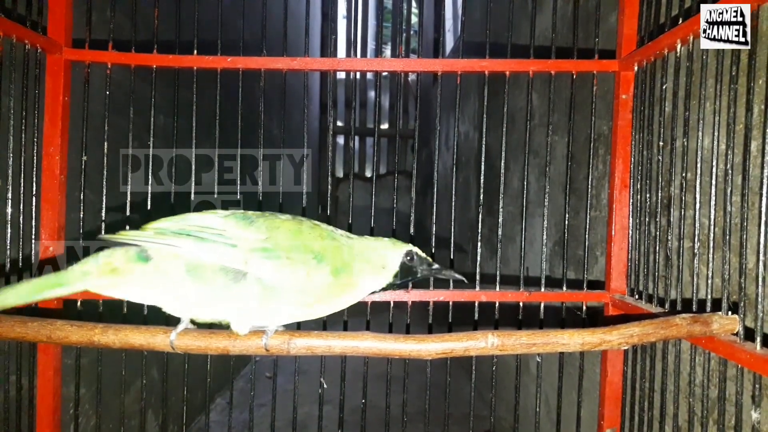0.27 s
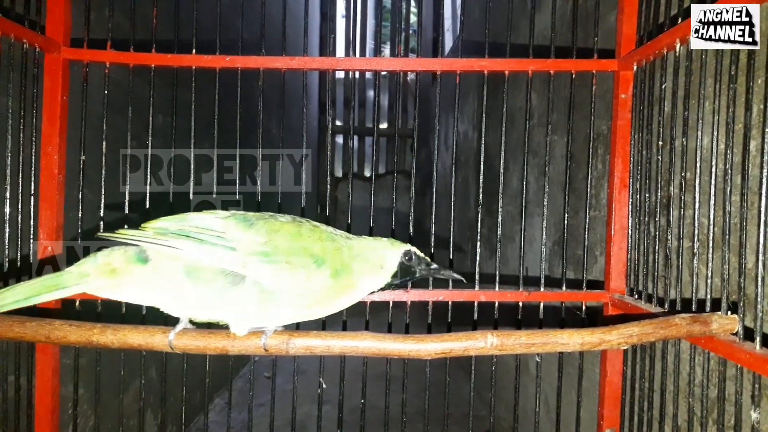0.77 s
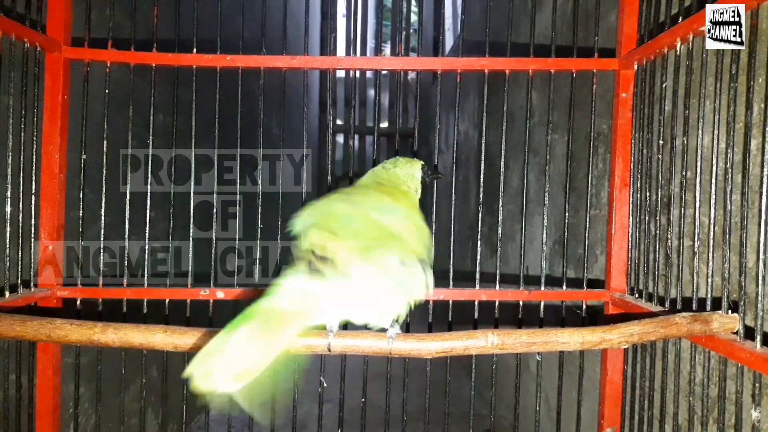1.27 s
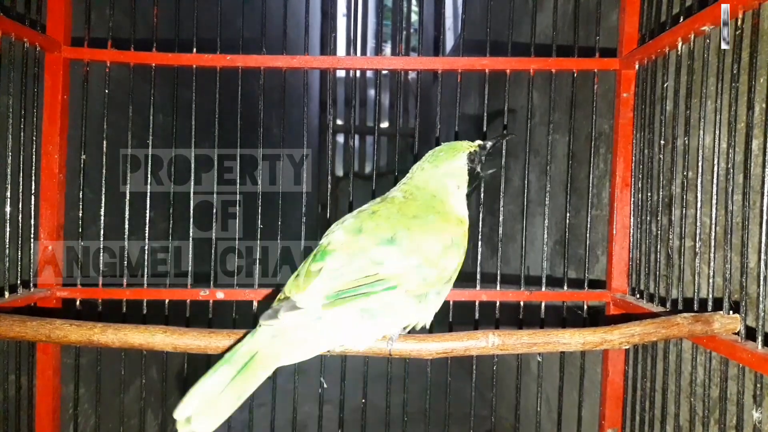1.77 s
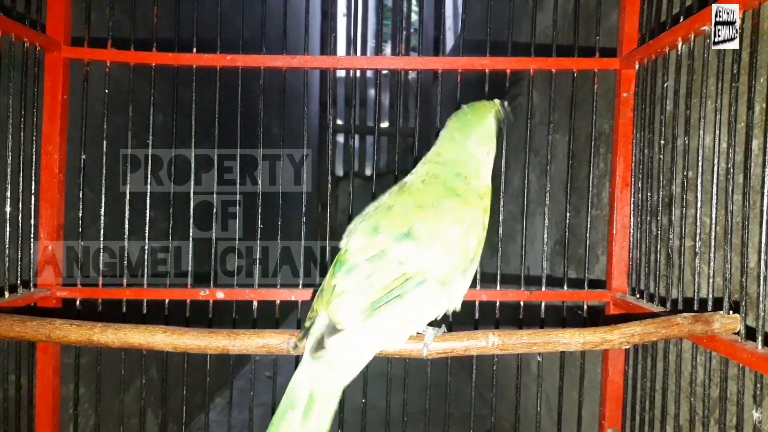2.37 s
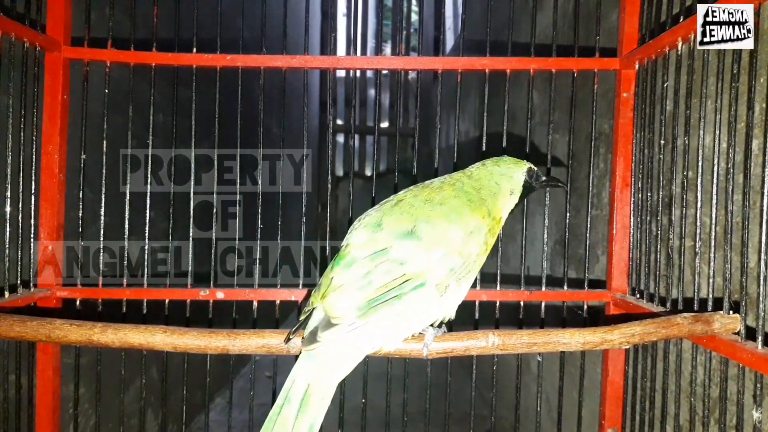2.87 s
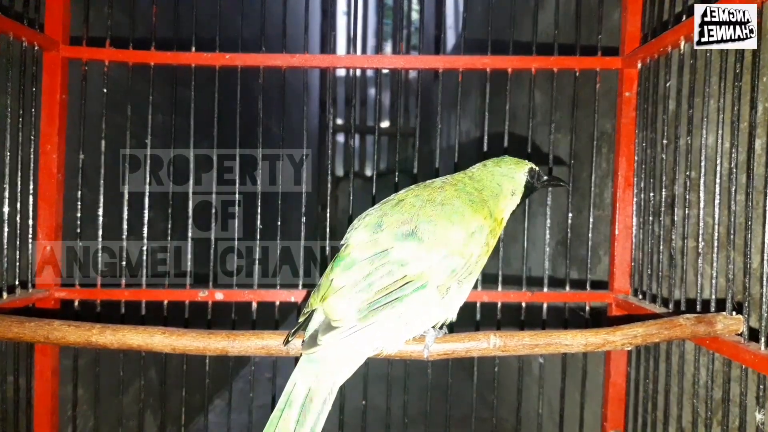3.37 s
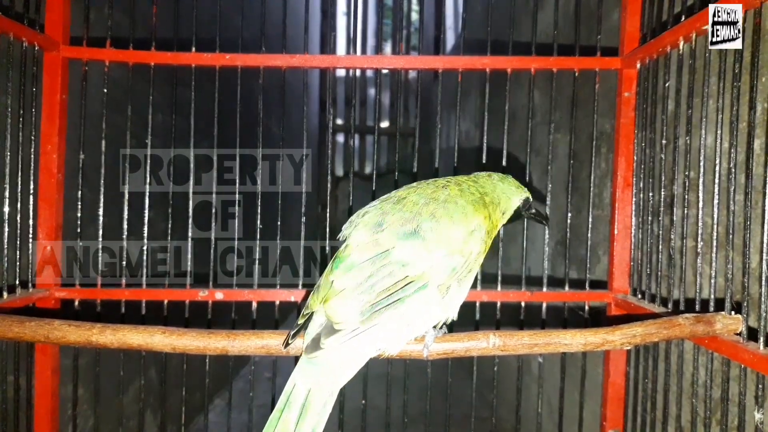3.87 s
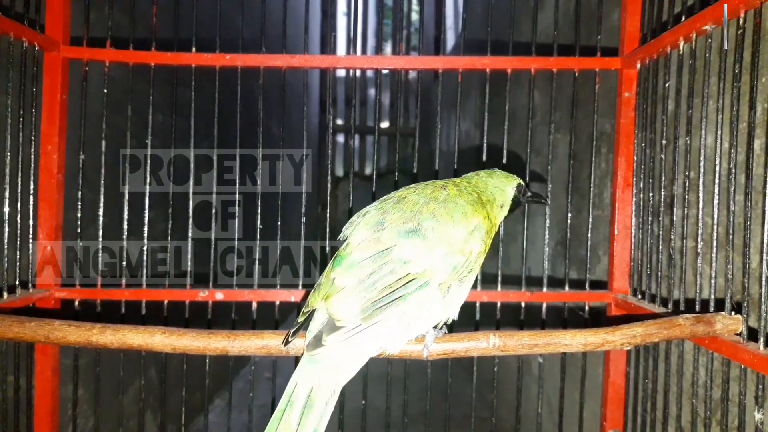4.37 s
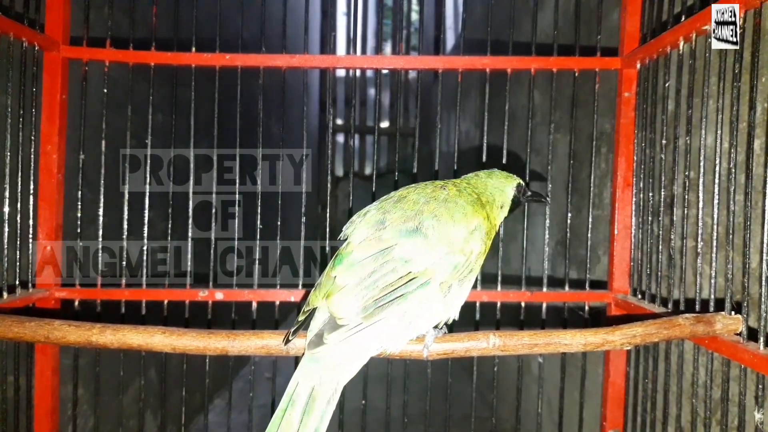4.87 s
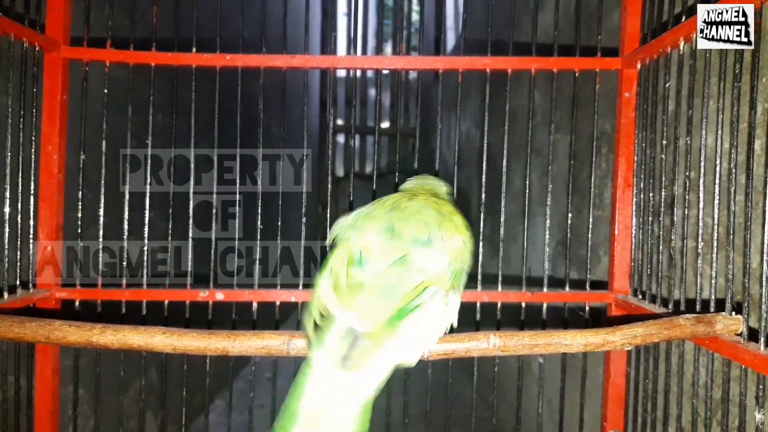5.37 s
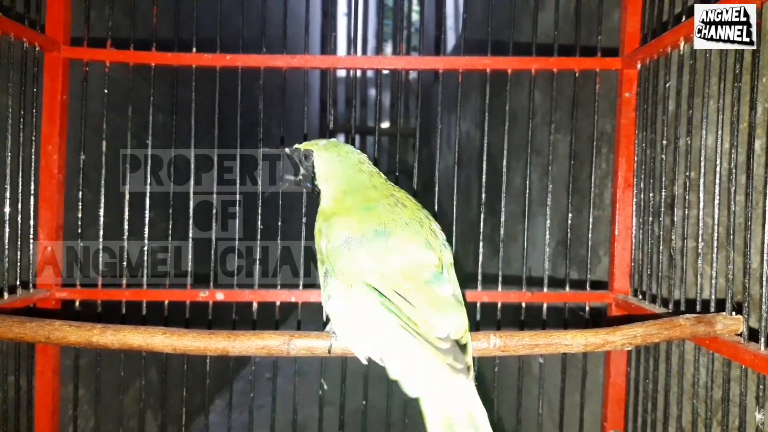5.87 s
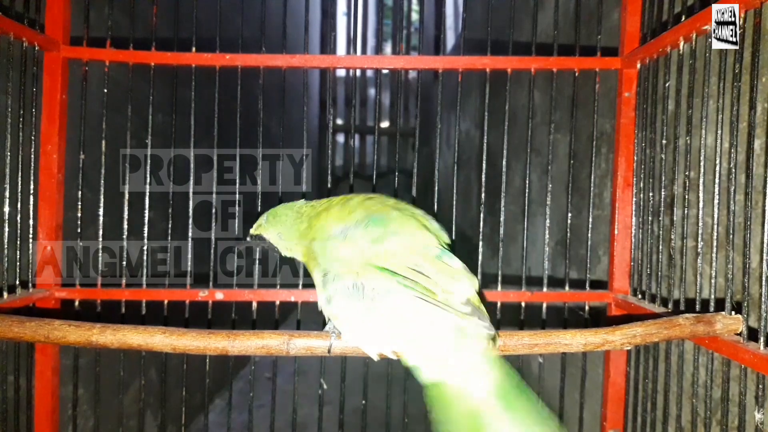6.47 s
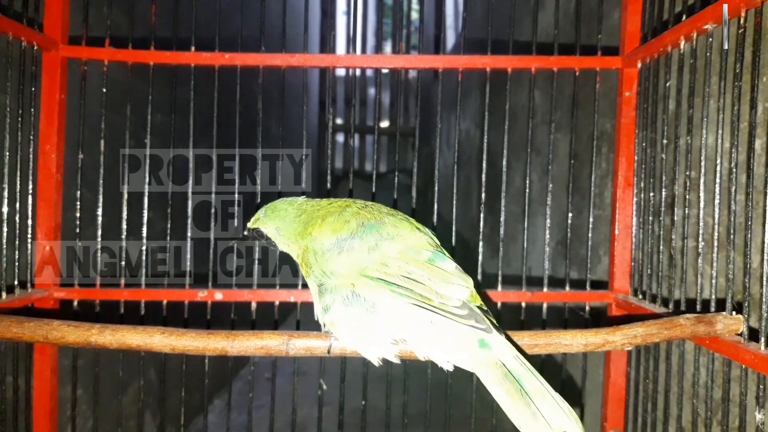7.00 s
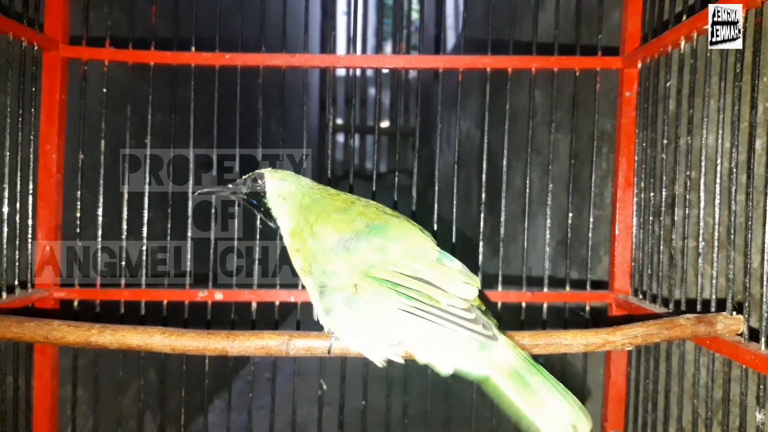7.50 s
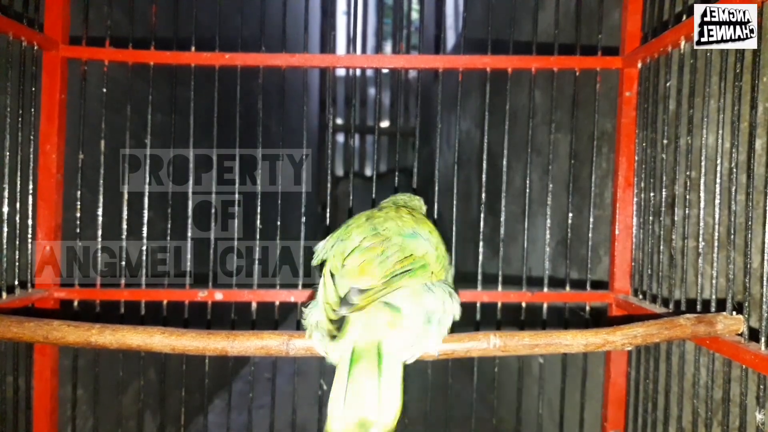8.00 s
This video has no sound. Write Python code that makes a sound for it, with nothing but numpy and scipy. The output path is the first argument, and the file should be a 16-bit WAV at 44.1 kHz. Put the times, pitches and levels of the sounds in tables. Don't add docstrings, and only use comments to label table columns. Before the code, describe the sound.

A songbird in a cage, close to a phone microphone in a small hard-walled room. After a light cage tick and quiet humming air, it whistles five clear gliding notes, two high then three lower. The background sinks, then returns with very faint distant coos and ticks. A second similar five-note phrase follows, briefly echoing off the walls, and faint ticks end it over soft hiss.

```python
import sys
import numpy as np
from scipy import signal
from scipy.fft import rfft, irfft
from scipy.io import wavfile
from scipy.ndimage import uniform_filter1d, minimum_filter1d

SR = 44100
rng = np.random.default_rng(int(sys.argv[2]) if len(sys.argv) > 2 else 0)


def volts(x):
    e = np.asarray(x, float) / 20
    return 10 ** e


def transcribe(signal):
    frames = np.atleast_2d(signal).T
    limited = np.clip(frames, -1, 1)
    pcm = np.round(limited * 32767).astype(np.int16)
    wavfile.write(sys.argv[1], SR, pcm)


N = 363384
T = np.arange(N) / SR


def unit(x):
    return x / np.sqrt(np.mean(x ** 2))


def band(x, lo_hz, hi_hz):
    return signal.sosfilt(signal.butter(2, [lo_hz, hi_hz], "band", fs=SR, output="sos"), x)


def lowpass(hz):
    return signal.butter(2, hz, fs=SR, output="sos")


def add(out, start_s, x):
    i = int(start_s * SR)
    out[i:i + len(x)] += x[:N - i]


def walk(rate):
    hold = int(SR / rate)
    steps = np.repeat(rng.standard_normal(N // hold + 1), hold)
    return 0.88 * uniform_filter1d(uniform_filter1d(steps, hold), hold)[:N]


def whistle(hz, db, overtones_db, rough):
    phase = 2 * np.pi * np.cumsum(hz) / SR
    tone = volts(db) * np.sin(phase)
    for k, under_db in enumerate(overtones_db, 2):
        noise = np.convolve(rng.standard_normal(len(hz)), np.hanning(150), "same")
        flutter = 1 + rough * unit(noise)
        level = volts(under_db + .7 * (np.asarray(db) + 8) - 8)
        tone = tone + level * flutter * np.sin(k * phase) * (k * hz < 17000)
    return np.sqrt(2) * tone


def arch(t, start, top, rest, rise, fall, late=False, quick=False):
    up = np.sin(np.pi / 2 * np.clip(t / rise, 0, 1)) ** (1 + late)
    down = np.sin(np.pi / 2 * np.clip((t - rise) / fall, 0, 1)) ** (2 - quick)
    return start + (top - start) * up - (top - rest) * down


# start_s, length_s, level_db, sag_db over the note, attack_s
NOTE_EVENTS = [
    (1.576, 0.099, -6, -4, .012),
    (1.737, 0.11, -9, -1.5, .014),
    (2.097, 0.098, -7.5, -7, 0.031),
    (2.283, 0.098, -11.5, -3, 0.023),
    (2.460, 0.11, -4.5, -10.5, 0.03),
    (5.879, .142, -4, -10, .014),
    (6.038, 0.13, -8.5, -1.5, .024),
    (6.352, 0.12, -4.5, -3.5, 0.031),
    (6.550, 0.079, -6, -3.5, 0.019),
    (6.750, 0.085, -10, 4.5, 0.014),
]
# from_hz, top_hz, rest_hz, rise_s, fall_s
NOTE_ARCHES = [(3980, 4400, 3772, .038, .025), (3850, 4420, 4275, .054, .032),
               (3300, 3665, 2930, .017, .063), (2900, 3000, 2530, .014, .058),
               (2740, 3285, 2865, .035, .052), (4020, 4420, 3785, .040, .034),
               (3750, 4570, 4570, .052, .030), (3250, 3455, 3060, .035, .047),
               (2890, 2925, 2545, .011, .050), (3020, 3430, 2862, .034, .046)]
NOTE_SNAPS = (1700.5, 1247, 0, -5.5, -0.5, 500, 0.5, 499, 0, -4)
NOTE_OVERTONES = [(-29, -32, -43.5, -55, -72), (-33.5, -27.5, -49, -63.5, -73), (-35.5, -34, -44, -38, -70),
                  (-37.5, -39, -44, -38.5, -50.5), (-39.5, -38.5, -53, -34.5, -68),
                  (-30.5, -30.5, -38, -63.5, -74.5), (-27, -28, -48, -60, -70),
                  (-36.5, -32.5, -46.5, -46, -76), (-35, -39.5, -52.5, -43.5, -35.5),
                  (-35.5, -36.5, -45.5, -45.5, -70)]
LATE_RISERS, QUICK_FALLERS = (5, 9), (3, 8)
SNAP_S, RELEASE_S, SILENT_DB = .0035, .013, -29


def song_notes():
    out, waver = np.zeros(N), walk(70)
    rows = zip(NOTE_EVENTS, NOTE_ARCHES, NOTE_SNAPS, NOTE_OVERTONES)
    for k, ((start_s, length, db, sag, attack), shape, snap, overtones) in enumerate(rows):
        t = T[:int(length * SR)]
        opening = np.clip(1 - t / attack, 0, 1) ** 2
        closing = np.clip(1 - (length - t) / RELEASE_S, 0, 1) ** 2
        level_db = db + sag * t / length + SILENT_DB * (opening + closing)
        hz = arch(t, *shape, late=k in LATE_RISERS, quick=k in QUICK_FALLERS)
        hz = hz - snap * np.exp(-t / SNAP_S)
        hz = hz * (1 + .003 * waver[int(start_s * SR):][:len(t)])
        note = whistle(hz, level_db, overtones, rough=0.32)
        add(out, start_s, note * signal.windows.tukey(len(t), .06))
    return out


# centre_s, depth_db, width_s
LEVEL_DIPS = [(2.345, -8, .014), (2.548, -8, 0.0031), (5.955, -6, 0.01), (1.598, -22.5, 0.0022),
              (1.614, -28.5, 0.0015), (1.77, -27, 0.0012), (1.815, -9, 0.0011), (2.143, -18, 0.0014),
              (2.510, -2.5, 0.0016), (5.913, -20, 0.00092), (5.99, -22, 0.0038), (6.089, -14.5, 0.0013),
              (6.128, -16.5, 0.0063), (6.145, -10, 0.0018), (6.413, -17, 0.0023), (6.579, -10.5, 0.0048),
              (6.79, -27, 0.0053)]


def level_dips():
    return volts(sum(db * np.exp(-((T - s) / width) ** 2) for s, db, width in LEVEL_DIPS))


# start_s, length_s, from_hz, to_hz, level_db, overtone_db
SECOND_VOICE = [(1.569, .012, 1600, 2500, -32, -9), (5.875, 0.0075, 2807, 3920, -17, -12.5),
                (1.622, 0.019, 2546, 3920, -16, -23), (1.786, 0.012, 3050, 3960, -16, -21),
                (5.922, 0.011, 2680, 3574, -17.5, -21), (5.935, 0.014, 3050, 3730, -14.5, -20),
                (6.08, 0.015, 2900, 3670, -16, -24.5), (6.089, 0.0051, 3420, 3580, -16.5, -11),
                (6.113, 0.0094, 3610, 3730, -19.5, -20.5), (6.129, 0.0069, 3780, 3820, -25, -15.5)]


def chirps():
    out = np.zeros(N)
    for start_s, length, lo, hi, db, over in SECOND_VOICE:
        u = np.arange(0, 1, 1 / (length * SR))
        hz = lo + (hi - lo) * np.sqrt(u)
        chirp = whistle(hz, db, [over, over - 8, over - 12], rough=0.37)
        add(out, start_s, chirp * np.sin(np.pi * u))
    return out


def puffs(table, lo_hz, hi_hz):
    out = np.zeros(N)
    for start_s, length, db in table:
        puff = rng.standard_normal(int(length * SR))
        puff = unit(band(band(puff, lo_hz, hi_hz), lo_hz, hi_hz))
        add(out, start_s, volts(db) * puff * signal.windows.tukey(len(puff), .6))
    return out


# start_s, length_s, level_db
VALVE_CLICKS = [(1.566, 0.004, -25.5), (1.568, .010, -32), (1.735, 0.0034, -34), (2.087, 0.014, -44.5),
                (2.281, .015, -46), (2.366, 0.0053, -45), (2.454, 0.01, -42.5), (2.558, 0.0034, -40.5),
                (5.865, 0.014, -31), (6.078, 0.029, -41.5), (6.349, 0.0084, -37.5), (6.559, 0.0055, -34),
                (6.745, .006, -47)]


def valve_clicks():
    return puffs(VALVE_CLICKS, lo_hz=1500, hi_hz=4650)


# start_s, length_s, level_db
VOICE_RASPS = [(1.57, .012, -36), (1.615, 0.019, -35.5), (1.784, .013, -40.5), (5.876, 0.011, -36),
               (5.922, 0.025, -35.5), (6.085, 0.017, -33.5), (6.092, .040, -44.5)]


def rasps():
    return puffs(VOICE_RASPS, lo_hz=5320, hi_hz=15400)


def bird():
    first = song_notes() * level_dips()
    second = chirps()
    voices = first + second + volts(-20.0) * first * second
    return voices + valve_clicks() + rasps()


def click(db, lo_hz, hi_hz, decay_s):
    t = T[:1500]
    noise = unit(band(rng.standard_normal(len(t)), lo_hz, hi_hz))
    return volts(db) * noise * np.exp(-t / decay_s) * (1 - np.exp(-t / 0.0016))


# start_s, level_db, high_hz
LOW_THUDS = [(1.628, -25, 1500), (1.634, -26, 1000), (1.786, -30, 1800), (1.793, -30, 1800)]


def thuds():
    out = np.zeros(N)
    for start_s, db, hi in LOW_THUDS:
        add(out, start_s, click(db, 170, hi, decay_s=.0025))
    return out


# start_s, level_db, low_hz, high_hz
CAGE_TICKS = [(.031, -37.5, 2000, 7000), (.609, -44, 2100, 11000), (1.210, -40, 5100, 15500),
              (4.366, -41, 1100, 9000), (5.649, -39, 1000, 6000), (7.685, -55, 10000, 15700),
              (7.82, -54, 5000, 19000), (8.22, -51, 9000, 11900)]


def cage_ticks():
    out = np.zeros(N)
    for start_s, db, lo, hi in CAGE_TICKS:
        add(out, start_s, click(db, lo, hi, decay_s=0.0034))
    return out


def room(x, t60_s=.22, late_t60_s=0.33, late_db=-15, treble_t60_s=0.18,
         wet_db=-6, treble_wet_db=-2.5, onset_s=0.009, gap_s=0.0066):
    t = T[:int(.7 * SR)]
    echoes = rng.standard_normal(len(t)) * (1 - np.exp(-np.maximum(t - gap_s, 0) / onset_s))
    low = signal.sosfilt(lowpass(5500), echoes)
    near_fall = volts(-60 * t / t60_s)
    size = np.sqrt(np.sum((echoes * near_fall) ** 2))
    fall = near_fall + volts(late_db - 60 * t / late_t60_s)
    treble_fall = volts(treble_wet_db - 60 * t / treble_t60_s)
    tail = low * volts(wet_db) * fall + (echoes - low) * treble_fall
    return x + signal.fftconvolve(x, tail / size)[:N]


def tones(table, waver_db):
    out = np.zeros(N)
    for start_s, length, hz, db in table:
        t = T[:int(length * SR)]
        add(out, start_s, volts(db) * np.sin(2 * np.pi * hz * t) * signal.windows.tukey(len(t), .3))
    return out * volts(waver_db * walk(16))


# start_s, length_s, pitch_hz, level_db
FAR_COOS = [(3.33, .22, 805, -47), (3.58, .18, 1175, -53), (3.9, .1, 410, -50), (4.02, .16, 412, -48),
            (4.14, .2, 805, -52), (4.55, .2, 755, -56), (5.02, .09, 770, -52)]


def coos():
    return tones(FAR_COOS, waver_db=1.5)


# start_s, length_s, pitch_hz, level_db
MOTOR_DRONES = [(.4, 0.48, 131, -35), (.86, 0.81, 114, -35), (1.6, 1.47, 114, -50.5),
                (6.02, 0.28, 137.5, -40), (2.3, 3.7, 56.2, -46), (4.6, 0.59, 52.2, -55)]


def drones():
    return tones(MOTOR_DRONES, waver_db=1.0)


def coloured(points):
    hz, db = np.transpose(points)
    f = np.arange(N // 2 + 1) * SR / N + 1e-3
    gain = volts(np.interp(np.log(f), np.log(hz), db))
    return irfft(rfft(rng.standard_normal(N)) * gain, N)


# freq_hz, level_db per Hz
AIR_SPECTRUM = [(120, -39), (200, -6.5), (263, -3.5), (401, -3), (455, -7.5), (537, -4), (681, -9.5),
                (774, -6.5), (1670, -9.5), (2590, -16.5), (6000, -24.5), (7200, -23.5), (8330, -35.5),
                (13400, -33.5), (15800, -37)]


def air_hiss():
    air = coloured(AIR_SPECTRUM)
    level_db = -46.5 + 0.46 * walk(9.3) + 1.0
    return air / np.std(band(air, 400, 1500)) * volts(level_db)


# freq_hz, level_db per Hz
HUM_SPECTRUM = [(12, -51), (20, -20), (46, -12), (118, 2.5), (182, -4), (216, -18.5), (265, -31.5),
                (300, -9.5), (390, -44), (660, -120)]
# centre_hz, width_hz, level_db
ROOM_MODES = [(82.7, 33, -7), (114, 14, -7), (139.6, 12, -6.5), (177.4, 20, -7)]
# time_s, level_db
TRAFFIC_LEVEL = [(0, -38), (.3, -41), (.6, -37.5), (1.5, -38), (3.4, -41.5), (4.3, -40.5), (5.9, -40),
                 (7.0, -38.5), (7.9, -42.5), (8.24, -43.5)]


def low_hum():
    hum = unit(coloured(HUM_SPECTRUM))
    for hz, width, db in ROOM_MODES:
        mode = unit(band(rng.standard_normal(N), hz - width / 2, hz + width / 2))
        hum = hum + volts(db + 1.5 * walk(4.4)) * mode
    hum = signal.sosfilt(signal.butter(2, 36, "high", fs=SR, output="sos"), hum)
    deep = signal.sosfiltfilt(lowpass(78), hum)
    traffic_db = np.interp(T, *np.transpose(TRAFFIC_LEVEL)) - 2.0
    return unit(hum - deep) * volts(traffic_db) + unit(deep) * volts(-46.5 + 4.2 * walk(3))


# start_s, attack_s, depth_db, held_db when let go, let_go_s
GAIN_DUCKS = [
    (1.54, 0.22, -13.5, -9.5, 3.078),
    (5.86, .10, -6, -10, 7.376),
]


def ducking():
    return sum(np.interp(T, [s, s + attack, go, go + 0.42], [0, db, held_db, 0])
               for s, attack, db, held_db, go in GAIN_DUCKS)


def background():
    return (air_hiss() + low_hum()) * volts(ducking()) + drones()


def scene():
    return (room(bird() + cage_ticks()) + thuds() + background() + coos())[None]


def roll_off(x):
    return signal.sosfilt(signal.butter(12, 16310, fs=SR, output="sos"), x)


def record(dry):
    headroom = np.minimum(1, .92 / (np.abs(dry) + 1e-9))
    x = dry * uniform_filter1d(minimum_filter1d(headroom, size=133), size=67)
    x = x - .012 * x ** 3
    x = x * ((T < .8382) | (T > .8585))
    x = signal.sosfilt(signal.ellip(12, .3, 60, 15760, fs=SR, output="sos"), x)
    return roll_off(x)


dry = scene()
out = record(dry)
transcribe(out)
```